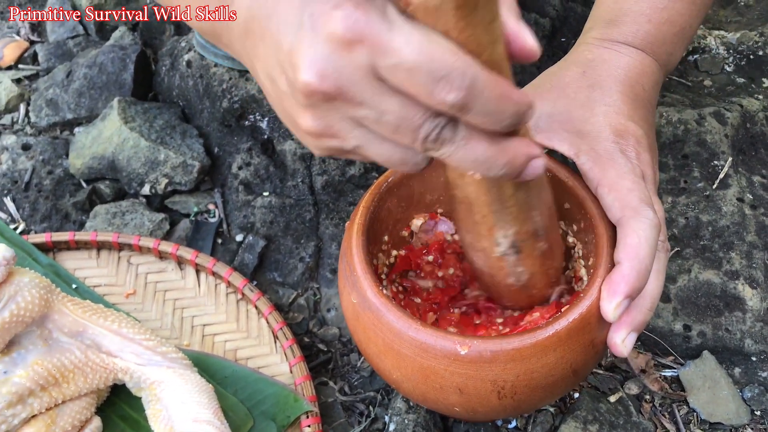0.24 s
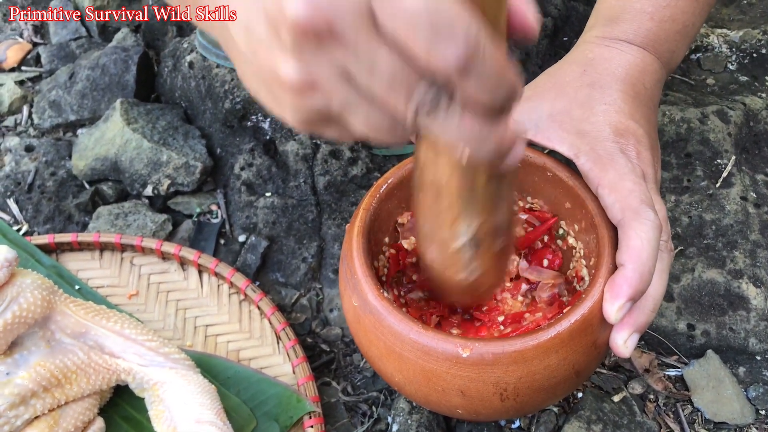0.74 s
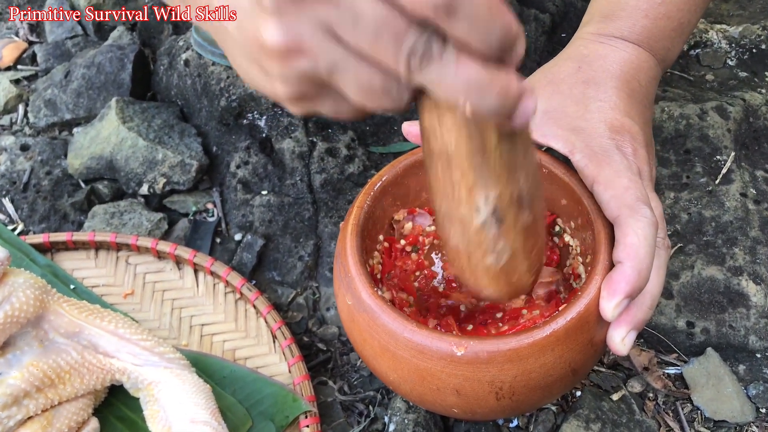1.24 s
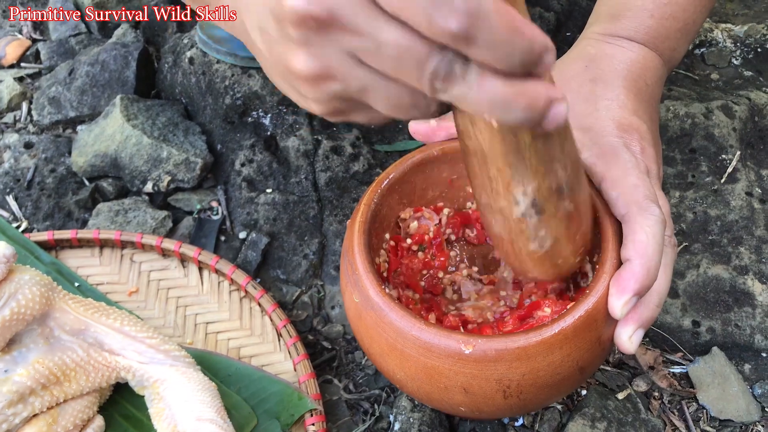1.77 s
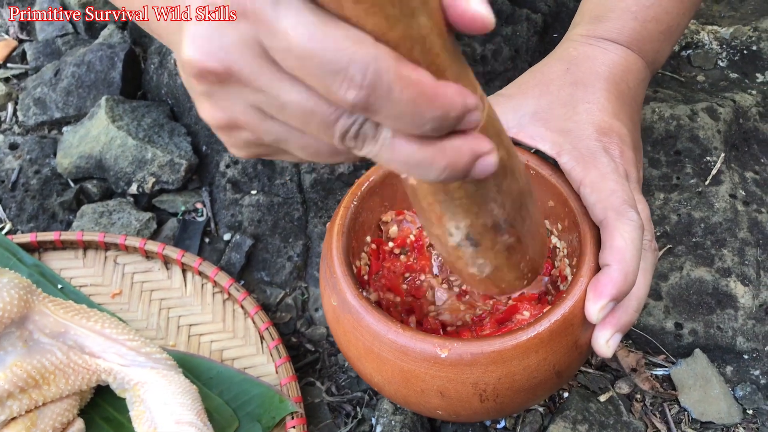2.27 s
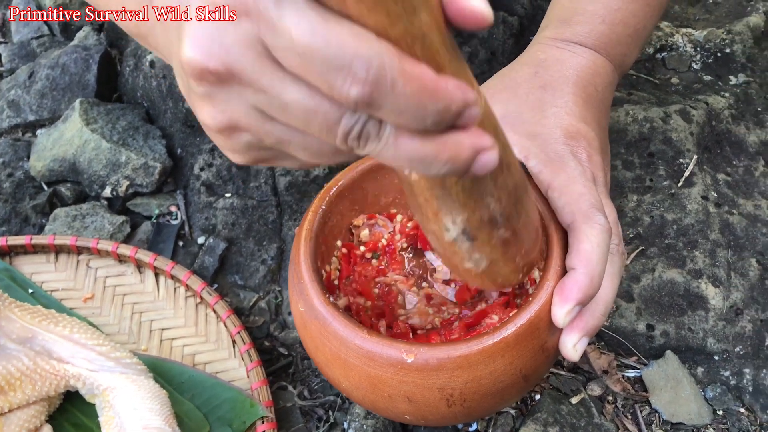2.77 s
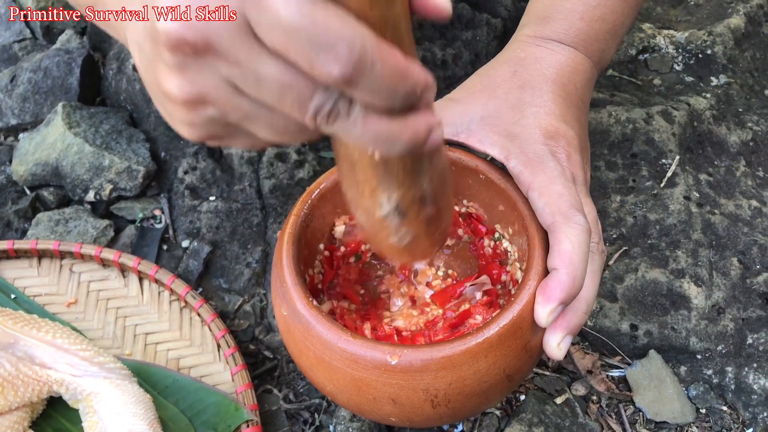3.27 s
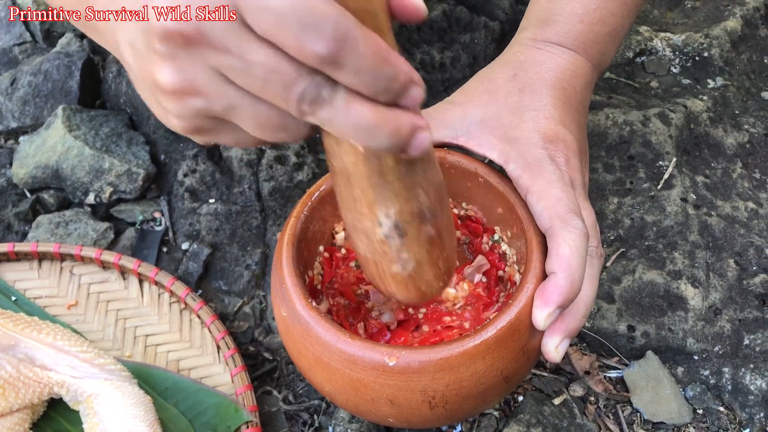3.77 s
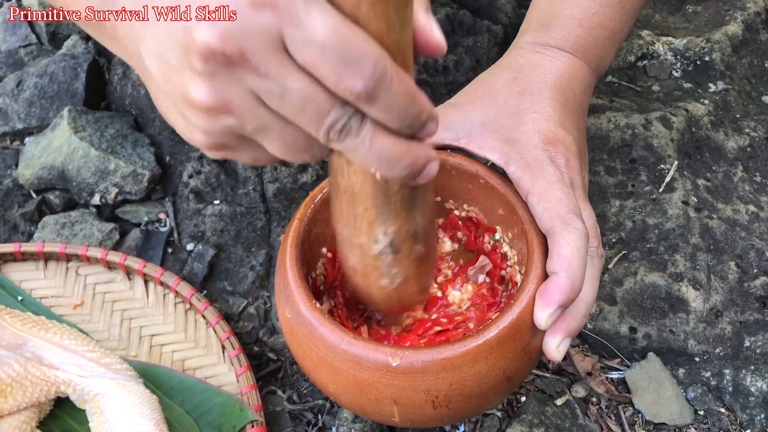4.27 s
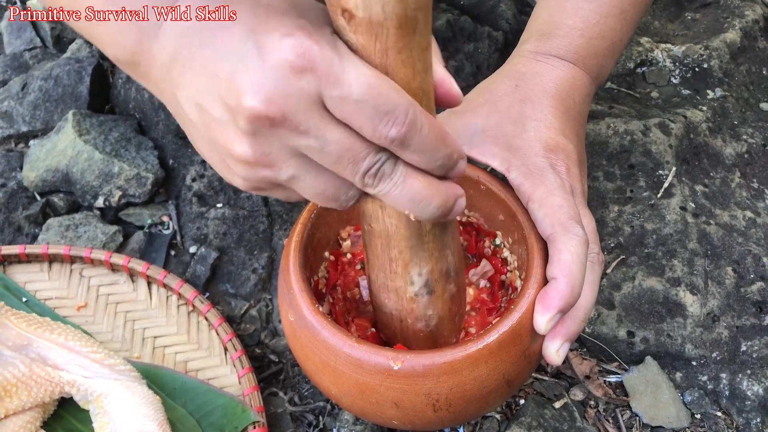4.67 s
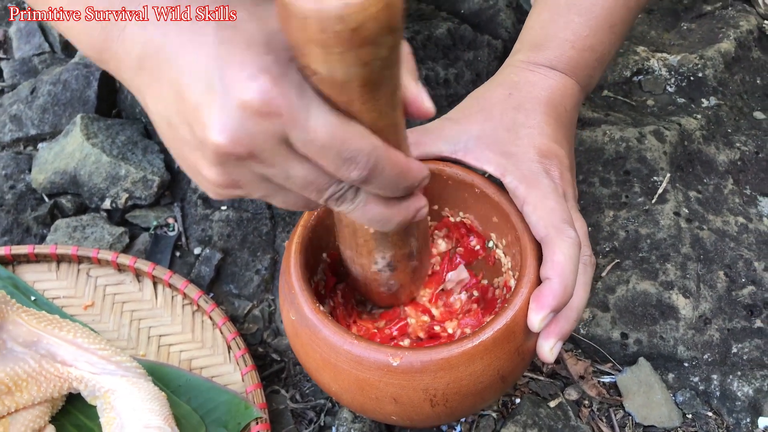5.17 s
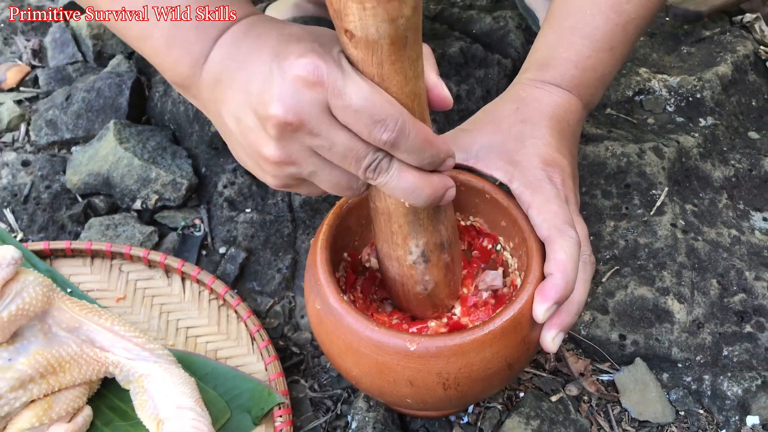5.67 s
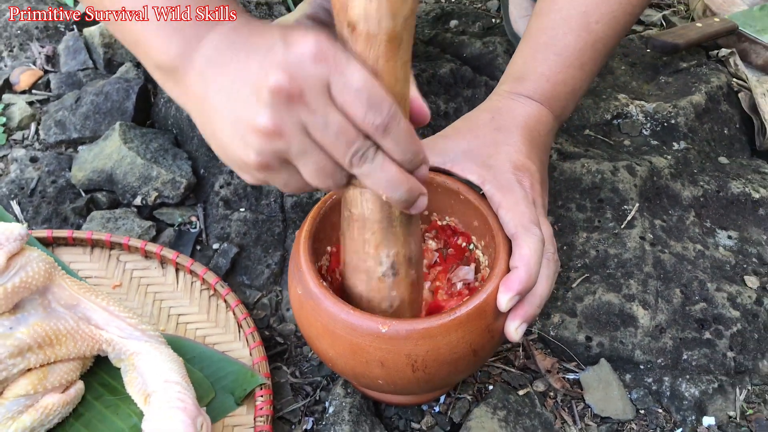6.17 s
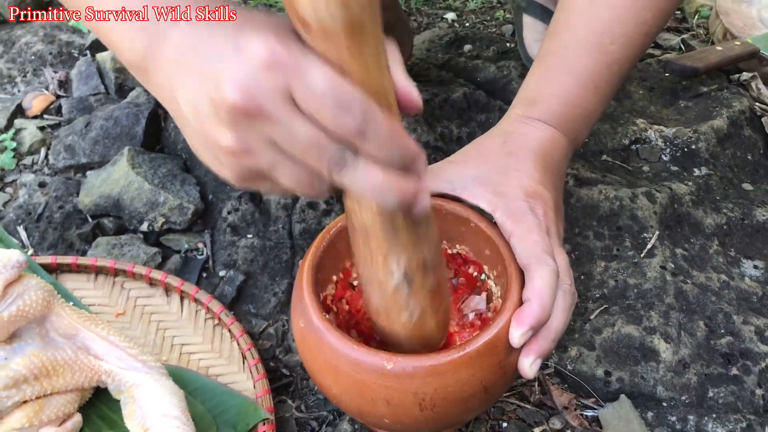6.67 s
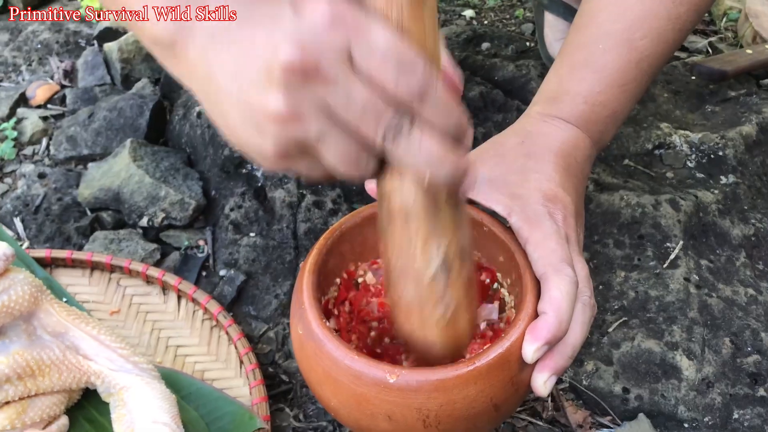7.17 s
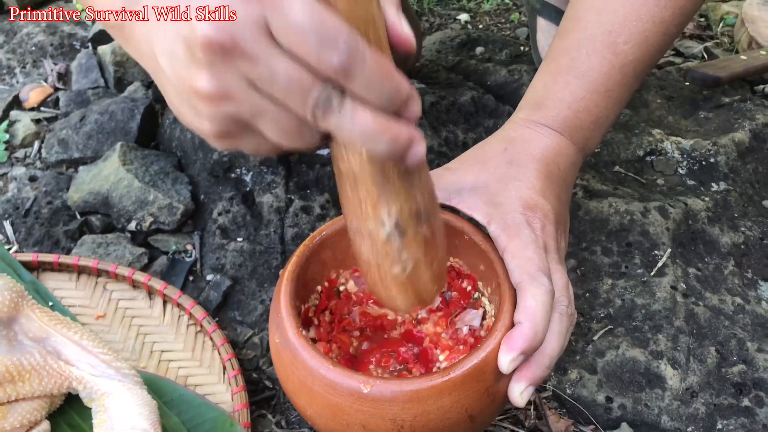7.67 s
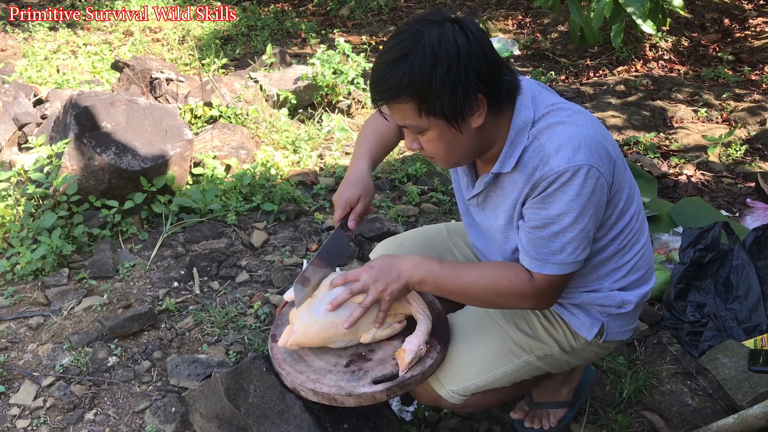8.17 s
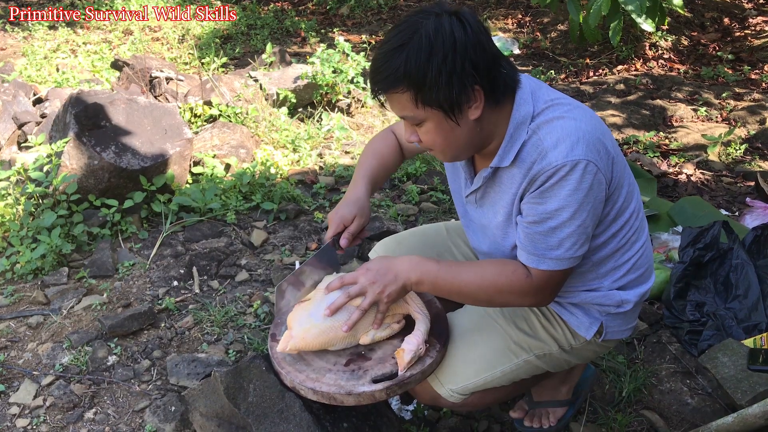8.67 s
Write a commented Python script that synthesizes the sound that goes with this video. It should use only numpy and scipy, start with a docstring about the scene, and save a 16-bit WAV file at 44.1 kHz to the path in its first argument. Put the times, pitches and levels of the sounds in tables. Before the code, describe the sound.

A close microphone catches steady but uneven pounding in a small clay bowl on stony ground: loud woody knocks alternate with cushioned, squelchy strokes, each with a crisp burst of crushed wet food. Paste clings, smacks and squirts as the pestle lifts. Echo is slight and open-air, over a faint motor-like hum. After almost eight seconds the pounding stops at once, leaving very soft slicing rustles and a few dry ticks, more distant.

```python
"""A wooden pestle pounds wet chillies in a clay mortar on the ground outdoors, about four strokes a second.
Each stroke crunches the food (crowds of tiny clicks and pops) and knocks on the bowl (short ringing tones)
almost together: hard where it gets through, dull where the paste cushions it. Paste smacks and squirts in
swells of wet pops. Faint whistling calls, a low drone and noise for the air lie behind. Near the end the
pounding gives way to a quiet spot with light knife work: soft rubbing noise and a few ticks."""
import sys
import numpy as np
from scipy import signal
from scipy.fft import rfft, irfft, next_fast_len
from scipy.io import wavfile
from scipy.ndimage import uniform_filter1d, minimum_filter1d

SR = 44100
rng = np.random.default_rng(int(sys.argv[2]) if len(sys.argv) > 2 else 0)


def generate_wav(sig):
    """Save sig (samples, or channels by samples) to the path in sys.argv[1] as 16-bit PCM at SR."""
    pcm = np.round(np.clip(np.atleast_2d(sig).T, -1, 1) * 32767).astype(np.int16)
    wavfile.write(sys.argv[1], SR, pcm)


N = 393813
TIME = np.arange(N) / SR  # seconds through the whole sound
AGE = TIME[:SR // 6]  # seconds since the start of one short burst

# a knock this weak is fully cushioned by paste; this strong, not at all
CUSHIONED_DB, BARE_DB = -25.5, -12


def cushioning(knock_db):
    """How much paste lies between pestle and bowl, from 0 to 1: weak knocks mean much paste."""
    return np.clip((BARE_DB - knock_db) / (BARE_DB - CUSHIONED_DB), 0, 1)


# the thud grows with the force of the stroke until the bowl is driven against the ground
THUD_DB, FULL_FORCE_DB, THUD_SLOPE, CRUNCH_FORCE_SHARE = -29.5, -22.5, 3, 0.64
# the bowl rocks on the ground after each blow; a cushioned pestle settles more heavily
ROCK_S, ROCK_LOSS_DB, CUSHION_SETTLE_DB, CUSHION_SOFTENS_DB = .0072, 7, 10.5, 0.5
# Upper tones of the hand-damped bowl, before each blow varies them.
# Each row: pitch in Hz, relative level in dB, time to fade by 60 dB in seconds.
BOWL_CLACK_TONES = [(1307, 3, .017), (1590, -1.5, 0.015), (1912, -4, 0.02), (2320, -13.5, 0.037),
                    (3096, -22, 0.029), (3580, -20.5, 0.025)]
# Bowl and pestle bouncing on the ground, before each blow varies them.
# Each row: pitch in Hz, relative level in dB, time to fade by 60 dB in seconds.
GROUND_THUD_TONES = [(111, -16, .04), (226, -10, 0.032), (270, 0.5, 0.023), (430.3, 1.5, 0.013),
                     (505, -0.5, .015)]
# Strokes of the pestle. Each row: time of the knock in seconds, knock level in dB before cushioning
# softens it, knock pitch in Hz, clack level in dB, crunch level in dB, lead of the crunch in seconds
# (negative when it follows the knock), crunch brightness in dB.
STROKES = [(0.0542, -26, 835, -53, -23, 0.0049, 6.5), (0.327, -38, 980, -44.5, -31, -0.0018, 2.5),
           (.611, -13.5, 903, -30.5, -19.5, 0.0042, -9), (.863, -.5, 928, -13.5, -16, 0.0026, -8),
           (1.121, -3, 924, -14, -19.5, 0.00097, 5.5), (1.3826, -3, 911, -13, -19, 0.0018, 4),
           (1.6639, -27, 940, -37.5, -23, 0.000097, -0.5), (1.9169, -36, 900, -41.5, -26, 0.0021, -6.5),
           (2.1892, 1.5, 945, -7.5, -18, -0.000048, 0.5), (2.451, -16.5, 965, -29, -12.5, 0.0022, 5),
           (2.7073, -30, 770, -39, -16, 0.00055, 4.5), (2.9582, -2, 943, -10.5, -23, -0.00012, -4),
           (3.2124, -2, 862, -19.5, -21.5, 0.001, -3), (3.4667, -21.5, 827, -31.5, -23.5, .0035, -6.5),
           (3.7075, -40.5, 934, -64, -35, .001, 2.5), (3.9856, -2, 917, -10, -19, 0.002, -5),
           (4.254, -1.5, 920, -10.5, -19.5, 0.00061, 3.5), (4.4878, -32, 988, -40, -33, 0.0012, -5),
           (4.7254, -41, 860, -54.5, -25, 0.002, -3), (4.9585, -34, 1040, -29.5, -27.5, 0.0022, -1.5),
           (5.2098, -21, 768, -24, -16, -0.00077, -21.5), (5.4976, -3, 908, -12, -18.5, .002, 3),
           (5.7521, -1, 939, -8.5, -16, -0.00025, 5), (5.9985, -2, 963, -8.5, -23, 0.0026, 1),
           (6.22, -18.5, 1020, -33.5, -37, -0.0019, -19), (6.2559, -28, 1044, -51, -41.5, 0, -7),
           (6.5237, -22, 920, -29, -25, -.0036, -2), (6.804, -23, 940, -38.5, -23, 0.0016, -2.5),
           (7.0371, -5.5, 961, -16, -23.5, 0.0014, -1), (7.3048, -6.5, 875, -22, -22.5, 0.0036, -1),
           (7.5528, -12.5, 824, -30.5, -18.5, 0.0015, -4.5), (7.8184, -2, 920, -7.5, -22.5, 0.0012, 3.5)]


def knocks(swell_db, swell_s, bounce_db, bounce_s):
    """The hollow main note of the bowl rings briefly, with a clack above and a thud below."""
    out = np.zeros(N)
    for s, knock_db, hz, clack_db, crunch_db, _, _ in STROKES:
        cushion = cushioning(knock_db)
        force = np.hypot(from_db(knock_db), CRUNCH_FORCE_SHARE * from_db(crunch_db))
        force_db = 20 * np.log10(force)
        thud_db = THUD_DB + THUD_SLOPE * min(force_db - FULL_FORCE_DB, 0)

        note_level = from_db(knock_db - CUSHION_SOFTENS_DB * cushion)
        note = note_level * unit_burst(ring(hz, t60=0.0091, rise_s=0.0021))
        add(out, s - .0003, note)

        # the pestle settles with a second, lighter touch
        settle_s = bounce_s * (1 + 0.092 * rng.normal() + .6 * cushion)
        add(out, s + settle_s, from_db(bounce_db + CUSHION_SETTLE_DB * cushion) * note)

        # a faint low-mid noise swells for a few milliseconds before each knock
        noise = colour(grains(len(AGE), uneven_db=5.0),
                       [(300, -28.5), (700, -5.5), (950, -2), (1300, -10.5), (3000, -37), (7000, -68.5)])
        growth = np.exp(-(AGE[::-1] / swell_s) ** 1.3)
        add(out, s - len(AGE) / SR, from_db(knock_db + swell_db) * unit_burst(noise * growth))

        clack = struck(BOWL_CLACK_TONES, rise_s=0.0006, vary_db=1.3, detune=.04)
        add(out, s - .0005, from_db(clack_db) * clack)
        for rock in range(3):
            rock_s = rock * ROCK_S * rng.uniform(.85, 1.15)
            thud = struck(GROUND_THUD_TONES, rise_s=0.00039, vary_db=2.57, detune=.035)
            add(out, s + rock_s, from_db(thud_db - rock * ROCK_LOSS_DB) * thud)
    return out


def struck(modes, rise_s, vary_db, detune):
    """Each blow lands on another spot, so it weights and tunes the ringing tones differently."""
    total = 0
    for k, (hz, db, t60) in enumerate(modes):
        level = from_db(db + vary_db * rng.normal())
        tone = ring(hz * (1 + detune * rng.normal()), t60, rise_s)
        total = total + (-1) ** k * level * tone
    return unit_burst(total)


def ring(hz, t60, rise_s):
    """A tone that builds up while the contact lasts, then dies."""
    fade = from_db(-60 * AGE / t60)
    build_up = 1 - np.exp(-(AGE / rise_s) ** 2)
    return np.sin(2 * np.pi * hz * AGE) * fade * build_up


POP_CYCLES = 22  # each wet pop fades by 60 dB in this many cycles
# a typical crunch; louder ones snap faster, cushioned ones drag
CRUNCH_DB, CRUNCH_SPREAD_S, SPREAD_HALVES_DB, CUSHION_DRAG = -19.5, .00095, 16.5, 0.84
POCKET_HZ, POCKET_SCATTER_DB, POCKET_Q = 3400, 2.04, 11  # dB scatter of the pitch as a ratio
# juice fizzes after each crunch; a cushioned stroke also churns the paste
SQUELCH_DB, SQUELCH_FOLLOWS, CUSHION_DAMPS_DB = -41.5, 0.64, 3
CHURN_DB, CHURN_FOLLOWS, CHURN_T60_S = -36.5, 0.26, .05
# Tone colour of crushed wet food. Each row: pitch in Hz, relative level in dB.
WET_FOOD_COLOUR = [(300, -15), (600, -2), (950, 1), (1500, -3.5), (2200, 1), (2900, -4.5), (3700, -1),
                   (6000, -0.5), (9000, -3.5), (11000, -5), (15000, -6.5), (17000, -10.5)]


def crunches(squelch_t60, rise_share, fall_share, pocket_db, wall_db, top_db):
    """Fractures crowd to a peak as the pestle sinks in; squeezed juice fizzes on after it."""
    out = np.zeros(N)
    burst_lead_s = .012  # the burst starts this long before its peak
    since = AGE - burst_lead_s
    for s, knock_db, _, _, level_db, lead_s, bright_db in STROKES:
        cushion = cushioning(knock_db)
        extra_db = level_db - CRUNCH_DB
        drag = 1 + CUSHION_DRAG * cushion
        spread_s = CRUNCH_SPREAD_S * 2 ** (-extra_db / SPREAD_HALVES_DB) * drag
        along = since / spread_s
        crowd = np.exp(np.where(along < 0, -(along / rise_share) ** 2, -along / fall_share))

        dry_clicks = rms_one(grains(len(AGE), uneven_db=3.5))
        fractures = dry_clicks + 0.72 * wet_pops(per_s=4100, cycles=POP_CYCLES, uneven_db=3.5)
        crack = colour(crowd * fractures, WET_FOOD_COLOUR)
        crack = colour(crack, [(4000, 0.0012), (7000, bright_db), (9500, bright_db),
                               (12500, bright_db + top_db)])
        # the air trapped under the pestle rings briefly
        pocket_hz = POCKET_HZ * from_db(POCKET_SCATTER_DB * rng.normal())
        crack = crack + from_db(pocket_db) * resonance(crack, pocket_hz, POCKET_Q)

        juice = fizz(since, squelch_t60, per_s=6000)
        churn = fizz(since, CHURN_T60_S, per_s=1800)
        juice_db = SQUELCH_DB + SQUELCH_FOLLOWS * extra_db - CUSHION_DAMPS_DB * cushion
        churn_level = cushion * from_db(CHURN_DB + CHURN_FOLLOWS * extra_db)

        # the near wall of the bowl reflects the sound under a millisecond later
        lag = round(rng.uniform(.0004, 0.00092) * SR)
        layers = ((crack, from_db(level_db)), (juice, from_db(juice_db)), (churn, churn_level))
        for sound, gain in layers:
            reflected = from_db(wall_db) * np.roll(sound, lag)
            add(out, s - lead_s - burst_lead_s, gain * unit_burst(sound + reflected))
    return out


def fizz(since, t60, per_s):
    """Wet pops that start at the crunch's peak and die away."""
    fade = (since > 0) * from_db(-60 * abs(since) / t60)
    return colour(fade * wet_pops(per_s, cycles=POP_CYCLES, uneven_db=3.5), WET_FOOD_COLOUR)


def wet_pops(per_s, cycles, uneven_db):
    """Tiny bubbles and films pop at random, each ringing a few cycles at one of 18 pitches; rms 1."""
    pitches = np.geomspace(900, 15000, num=18)
    pops = (rng.random(len(AGE)) < per_s / SR) * grains(len(AGE), uneven_db)
    dealt = rng.integers(0, len(pitches), len(AGE))  # which pitch each pop gets
    out = 0
    for k, hz in enumerate(pitches * from_db(rng.random())):
        r = from_db(-60 * hz / (cycles * SR))  # what is left after each sample
        w = 2 * np.pi * hz / SR
        ringing = [1, -2 * r * np.cos(w), r * r]
        out = out + signal.lfilter([0, hz * np.sin(w)], ringing, pops * (dealt == k) + 1e-18)
    faint_noise = .1 * np.std(out) * rng.standard_normal(len(AGE))
    return rms_one(out + faint_noise)


def resonance(x, hz, q):
    """One resonance with gain 1 at its peak."""
    b, a = signal.iirpeak(min(hz, SR / 3), max(q, 1), fs=SR)
    return signal.lfilter(b, a, x)


# lifts with no loud smack of their own smack faintly, a moment after the blow
LIFT_S, LIFT_SCATTER_S, LIFT_DB, LIFT_SCATTER_DB, LIFT_HZ, LIFT_SWELL_S = .064, .005, -59, 4, 3800, .008
CUSHION_STICKS_DB = 2.5  # thick paste clings and smacks louder
# The loudest smacks of paste letting go of the pestle.
# Each row: start in seconds, level in dB, centre pitch in Hz, swell in seconds.
LOUD_SMACKS = [(0.3947, -44.5, 4260, 0.015), (0.664, -46.5, 2020, .0075), (0.9384, -49, 4080, 0.0011),
               (1.7343, -50.5, 3050, 0.0061), (2.768, -48, 3590, 0.0114), (3.8071, -35.5, 3010, .0022),
               (4.067, -39.5, 3400, 0.0012), (4.5722, -47.5, 2470, 0.0066), (4.802, -42, 2540, 0.0016),
               (4.9223, -46, 1620, 0.0037), (5.2798, -47.5, 4600, 0.01), (6.594, -45.5, 1880, 0.0053),
               (7.108, -53, 3890, .0015)]


def smacks():
    """The paste smacks as the pestle pulls free: wet films pop in a short swell."""
    out = np.zeros(N)
    for s, level_db, hz, swell_s in LOUD_SMACKS:
        add(out, s - .004, wet_swell(level_db, hz, swell_s))
    chances = rng.standard_normal((len(STROKES), 2))
    for (s, knock_db, *_), (late, loud) in zip(STROKES, chances):
        has_loud_smack = any(0 < smack[0] - s < 2 * LIFT_S for smack in LOUD_SMACKS)
        if not has_loud_smack:
            level_db = LIFT_DB + CUSHION_STICKS_DB * cushioning(knock_db) + LIFT_SCATTER_DB * loud
            add(out, s + LIFT_S + LIFT_SCATTER_S * late, wet_swell(level_db, LIFT_HZ, LIFT_SWELL_S))
    return out


def wet_swell(level_db, hz, swell_s):
    """Small wet films pop in a short swell around one pitch."""
    pops = wet_pops(per_s=3000, cycles=POP_CYCLES, uneven_db=2.5)
    return from_db(level_db) * around(swell_shape(swell_s) * pops, hz)


def swell_shape(swell_s):
    """Loudness that rises to a peak after swell_s seconds, then falls away."""
    return AGE * np.exp(-AGE / max(swell_s, .0005))


def around(x, hz):
    """A burst with a broad peak at one pitch."""
    return unit_burst(colour(x, [(hz / 5, -18), (hz / 2, -4), (hz, 0), (hz * 2, -6), (hz * 4, -14)]))


# Paste squirting out from under the pestle. Each row: start in seconds, level in dB, swell in seconds.
PASTE_SQUIRTS = [(0.328, -37.5, 0.0055), (3.468, -30, 0.0061), (3.706, -38, 0.0072), (5.223, -23.5, 0.0045),
                 (6.261, -32, 0.0054)]


def squirts():
    """Paste forced up the wall hisses in a ragged swell of wet pops."""
    out = np.zeros(N)
    for s, level_db, swell_s in PASTE_SQUIRTS:
        pops = wet_pops(per_s=5000, cycles=POP_CYCLES, uneven_db=3.5)
        hiss = colour(swell_shape(swell_s) * pops, WET_FOOD_COLOUR)
        add(out, s, from_db(level_db) * unit_burst(hiss))
    return out


# Tone colour of the outdoor echoes. Each row: pitch in Hz, relative level in dB.
OUTDOOR_ECHO_COLOUR = [(150, -4), (500, -6.5), (850, -5), (1100, -0.5), (1400, -1.5), (1800, -5.5),
                       (2300, -2), (3200, -3.5), (8000, -7.5), (16000, -12.5)]


def surroundings(x, early_db, early_t60, late_db, late_t60, slap_db, slap_s):
    """Ground and stones scatter the blows almost at once; trees return a faint, narrow-toned tail."""
    age = TIME[:SR // 2]
    early = rng.standard_normal(len(age)) * from_db(-60 * age / early_t60) * (age > .004)
    late = rng.standard_normal(len(age)) * from_db(-60 * age / late_t60) * (age > .025)
    echo = from_db(early_db) * early / np.linalg.norm(early)
    tail = colour(late / np.linalg.norm(late),
                  [(400, -7.5), (750, -2), (1050, -1.5), (1600, -4.0), (4000, -8.0)])
    echo += from_db(late_db) * tail
    echo[round(slap_s * SR)] += from_db(slap_db)  # one distinct reflection
    return signal.fftconvolve(x, colour(echo, OUTDOOR_ECHO_COLOUR))[:N]


# The knife drawing through meat.
# Each row: start in seconds, length in seconds, level in dB before the overall rustle level and unevenness.
KNIFE_SLICES = [(7.99, .18, -76), (8.232, .14, -78), (8.457, .17, -76.5), (8.66, 0.28, -75.5)]
# A blade ticking on meat and board. Each row: start in seconds, level in dB, centre pitch in Hz.
BLADE_TICKS = [(8.2426, -45.5, 12000), (8.349, -63.5, 3800), (8.403, -68, 2396), (8.614, -61, 13000)]
# Tone colour of the rubbing. Each row: pitch in Hz, relative level in dB.
RUBBING_COLOUR = [(1500, -12), (3500, -4), (6500, 2), (10000, -8), (16000, 3)]


def knife_work(rustle_db, uneven_db):
    """Soft uneven rubbing that swells with each cut, and a few dry ticks of fading noise."""
    cuts = 0
    for s, length, db in KNIFE_SLICES:
        along = np.clip((TIME - s) / length, 0, 1)
        cuts = cuts + from_db(db) * np.sin(np.pi * along)
    rasp = from_db(rustle_db + uneven_db * drift(rate=46))
    out = cuts * rasp * rms_one(colour(grains(N, uneven_db=5.5), RUBBING_COLOUR))
    for s, level_db, hz in BLADE_TICKS:
        tick = rng.standard_normal(len(AGE)) * np.exp(-AGE / 0.0012)
        add(out, s, from_db(level_db) * around(tick, hz))
    return out


# Faint far-off calls. Each row: start in seconds, length in seconds, start pitch in Hz, end pitch in Hz,
# middle level in dB; pitch and level waver around these.
DISTANT_CALLS = [(3.1, .13, 1660, 1650, -75), (3.24, .1, 1630, 1590, -70), (4.54, .17, 1490, 1510, -75.5),
                 (6.29, .18, 1515, 1495, -73), (6.58, .32, 1480, 1440, -77)]


def far_calls():
    """Thin whistles: sine tones that glide while their pitch and level waver."""
    out = np.zeros(N)
    for s, length, start_hz, end_hz, level_db in DISTANT_CALLS:
        along = np.clip((TIME - s) / length, 0, 1)
        glide_hz = start_hz + (end_hz - start_hz) * along
        hz = glide_hz * (1 + .025 * drift(150))
        level = from_db(level_db + 2.5 * drift(33)) * np.sin(np.pi * along)
        out += level * np.sin(2 * np.pi * np.cumsum(hz) / SR)
    return out


# Strength of the low drone. Each row: time in seconds, level in dB before the overall level and waver.
DRONE_STRENGTH = [(0.0, -59.5), (1.74, -58.5), (5.59, -60), (5.64, -69.5), (6.34, -61), (8.85, -66.5),
                  (8.93, -65)]


def hum(level_db, waver_db, octave_db):
    """A low drone, perhaps a distant motor: a wavering sine and its octave."""
    strength_db = level_db + np.interp(TIME, *np.transpose(DRONE_STRENGTH)) + waver_db * drift(7)
    hz = 56.6 + 3.6 * drift(6.4)
    phase = 2 * np.pi * np.cumsum(hz) / SR
    return from_db(strength_db) * rms_one(np.sin(phase) + from_db(octave_db) * np.sin(2 * phase))


# Air around the mortar. Each row: pitch in Hz, relative level in dB.
MORTAR_AIR = [(15, -32), (25, -8), (49, -3), (74, 2.5), (394, -20), (754, -24.5), (936, -21), (1440, -28),
              (2610, -35), (4140, -38), (6050, -38), (7710, -42), (11600, -44), (14400, -47.5),
              (16000, -61)]
# Air at the quiet spot. Each row: pitch in Hz, relative level in dB.
QUIET_SPOT_AIR = [(15, -34), (25, -7), (59, 1.5), (102, -6.5), (145, -13.5), (170, -13.5), (489, -28),
                  (659, -24), (754, -27.5), (1130, -28), (1230, -30), (2480, -38.5), (3820, -42),
                  (11600, -45), (16000, -50)]


def air(spectrum, level_db):
    """Steady outdoor background: coloured noise without the deepest rumble."""
    rumble_cut = signal.butter(2, 45, "high", fs=SR, output="sos")
    noise = colour(rng.standard_normal(N), spectrum)
    return from_db(level_db) * rms_one(signal.sosfilt(rumble_cut, noise))


def from_db(db):
    """Turns decibels into a plain multiplier."""
    return 10 ** (np.asarray(db) / 20)


def rms_one(x):
    """Scales a sound to an average (rms) level of 1."""
    return x / np.sqrt(np.mean(x ** 2) + 1e-20)


def unit_burst(x):
    """Scales a burst to the energy of one millisecond at full level."""
    return x / np.sqrt(np.sum(x ** 2) * 1000 / SR + 1e-20)


def add(out, s, sound):
    """Mixes a sound in at time s."""
    start = round(s * SR)
    sound, start = sound[max(-start, 0):], max(start, 0)
    out[start:start + len(sound)] += sound[:max(N - start, 0)]


def colour(x, points):
    """Filters a sound along a (Hz, dB) curve, with no sound before its cause (minimum phase)."""
    size = next_fast_len(len(x) + 2048)
    hz, db = np.transpose(points)
    bins_hz = np.fft.rfftfreq(size, 1 / SR)
    gain = from_db(np.interp(np.log(bins_hz + 1), np.log(hz), db))
    # folding the cepstrum forward in time gives the minimum phase
    cepstrum = irfft(np.log(gain), size)
    cepstrum[1:size // 2] *= 2
    cepstrum[size // 2 + 1:] = 0
    return irfft(rfft(x, size) * np.exp(rfft(cepstrum)), size)[:len(x)]


def drift(rate):
    """Slow random wandering with spread near 1; rate is new values per second."""
    knots = rng.standard_normal(int(N / SR * rate) + 2)
    return np.interp(TIME * rate, np.arange(len(knots)), knots)


def grains(size, uneven_db):
    """Dense tiny clicks of very unequal strength."""
    boost_db = uneven_db * np.minimum(rng.exponential(1, size), 4)
    return rng.standard_normal(size) * from_db(boost_db)


def limiter(x, ceiling_db, release_db_per_s):
    """Hard knocks push the gain down at once; it springs back within milliseconds."""
    over = np.maximum(20 * np.log10(abs(x[0]) + 1e-9) - ceiling_db, 0)
    cut = np.maximum.accumulate(over + release_db_per_s * TIME) - release_db_per_s * TIME
    gain_db = uniform_filter1d(minimum_filter1d(-cut, size=33), size=33)
    return x * from_db(gain_db)


def scene():
    """The pounding over its background, then the quiet spot with the knife."""
    mortar = knocks(swell_db=-19.5, swell_s=.0062, bounce_db=-20.0, bounce_s=.005)
    mortar += squirts() + smacks()
    mortar += crunches(squelch_t60=.135, rise_share=1.9, fall_share=1.5,
                       pocket_db=-1, wall_db=-8.5, top_db=1.27)
    echoes = surroundings(mortar, early_db=-22.5, early_t60=.14, late_db=-42, late_t60=1.0,
                          slap_db=-25.5, slap_s=0.016)
    near = (echoes + air(MORTAR_AIR, level_db=-64) + far_calls()) * (TIME < 7.888)
    knife = knife_work(rustle_db=-0.8, uneven_db=7.5)
    far = (air(QUIET_SPOT_AIR, level_db=-62.5) + knife) * (TIME > 7.91)
    drone = hum(level_db=-1.1, waver_db=2.5, octave_db=-16.5)
    return (mortar + near + far + drone)[None]


def record(dry):
    """A limiter holds the peaks, then everything above 16 kHz is cut."""
    held = limiter(dry, ceiling_db=-2.7, release_db_per_s=900)
    top_cut = signal.ellip(10, .1, 80, 16000, fs=SR, output="sos")
    return signal.sosfilt(top_cut, held)


dry = scene()
out = record(dry)
generate_wav(out)
```